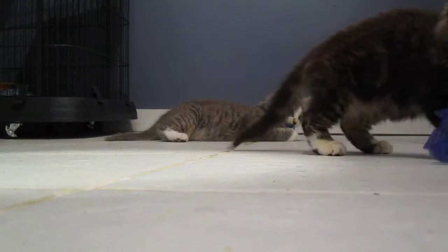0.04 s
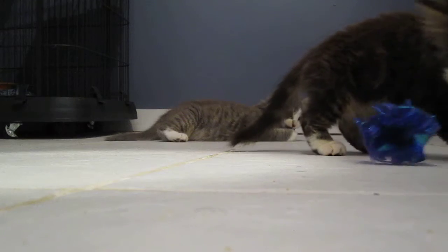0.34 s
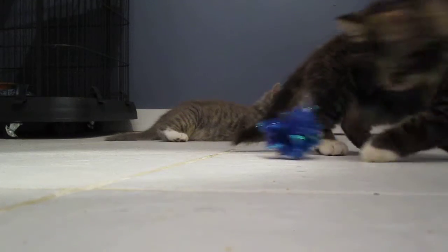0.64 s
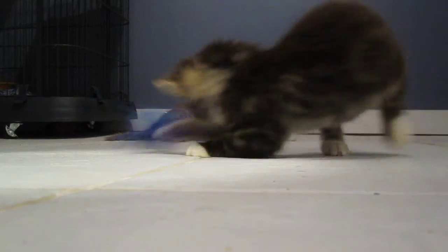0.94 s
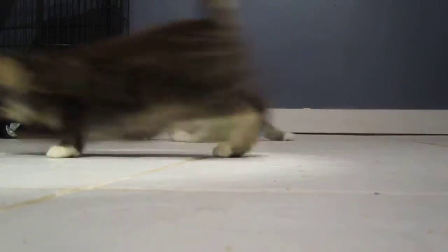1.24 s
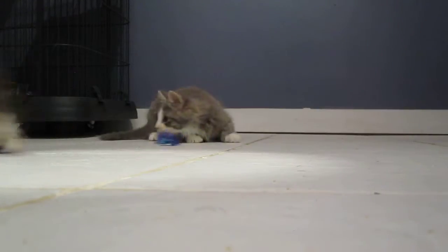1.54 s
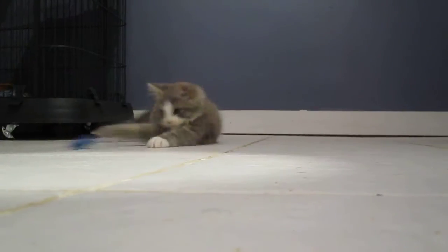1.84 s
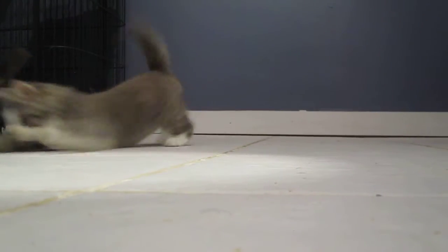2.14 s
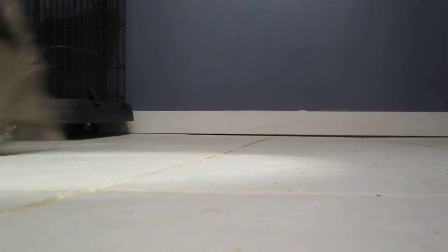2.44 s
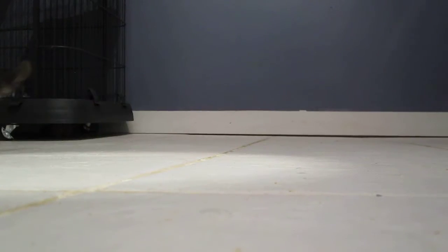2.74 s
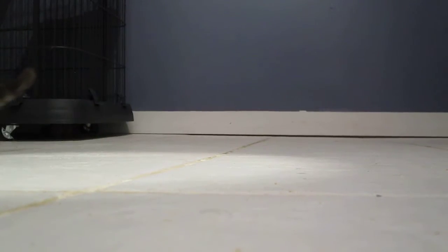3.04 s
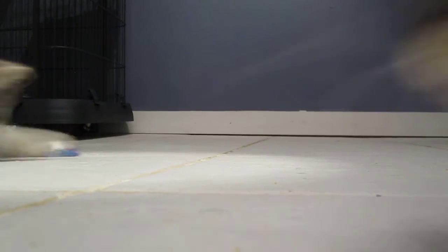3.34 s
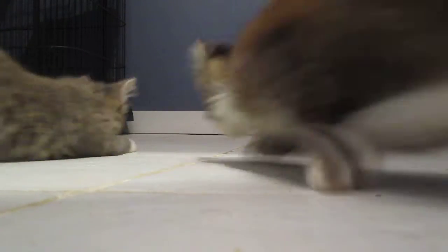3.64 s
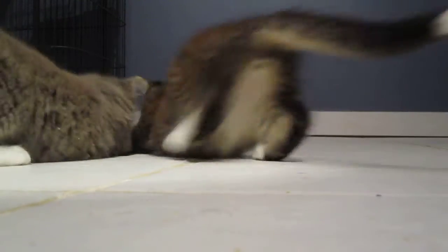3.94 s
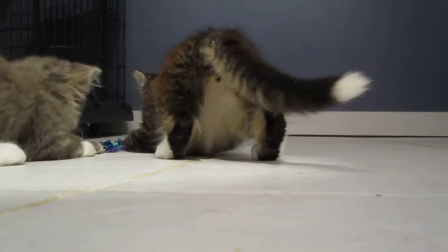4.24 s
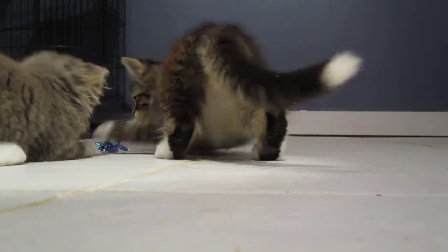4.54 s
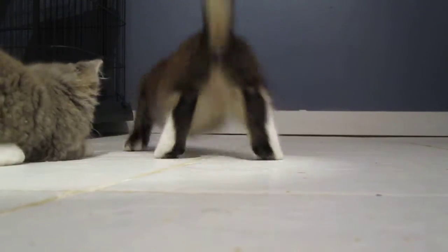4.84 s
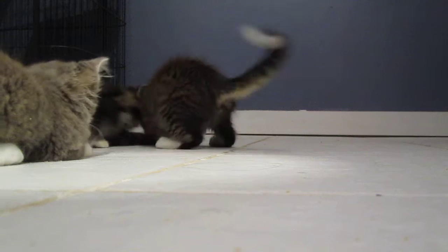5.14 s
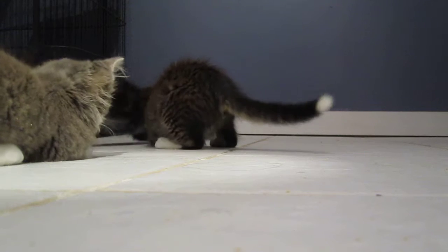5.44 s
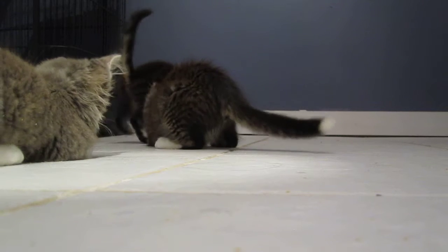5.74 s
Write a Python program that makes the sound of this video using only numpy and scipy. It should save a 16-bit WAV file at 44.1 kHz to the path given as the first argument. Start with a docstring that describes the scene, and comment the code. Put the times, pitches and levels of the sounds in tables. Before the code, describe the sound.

Kittens chase a crackling foil ball over tiles in an echoing room, paws thudding and claws ticking, with one bump against a wire cage.

```python
"""Kittens chase a foil ball over the tiles of a small, bare, echoing room, heard from floor level.
From the start the swatted ball crackles and rolls, while an appliance whines faintly behind it.
Claws tick and soft paws thud; after half a second come the first hissing skids.
Near 1.7 s a kitten slides along a wire cage and bumps it, and the wires ring on.
Then the play moves away: the swats grow weaker and carry more echo."""
import sys
import numpy as np
from scipy import signal
from scipy.fft import rfft, irfft, next_fast_len
from scipy.io import wavfile
from scipy.ndimage import uniform_filter1d, map_coordinates

SR = 44100
rng = np.random.default_rng(int(sys.argv[2]) if len(sys.argv) > 2 else 0)


def wav_out(sig):
    """Save sig, one row per channel (or a flat mono array), as 16-bit PCM at SR to the path in sys.argv[1]."""
    wavfile.write(sys.argv[1], SR, np.round(np.clip(np.atleast_2d(sig).T, -1, 1) * 32767).astype(np.int16))


N = 255339

# swats and squeezes of the foil ball: (time [s], level [dB], length [s], brightness [dB])
SWATS = [(0, -29.5, .008, 1), (0.011, -17, 0.0043, -3), (0.227, -39.5, .01, 0), (0.239, -20.5, .014, 0.5),
         (0.254, -29, 0.033, -9.5), (0.303, -36, 0.091, -10.5), (0.561, -24.5, 0.028, -4),
         (0.586, -23, 0.035, -1), (0.657, -19.5, 0.019, 7.5), (0.685, -26.5, .04, -3),
         (0.746, -36.5, .024, 6), (.871, -23.5, .018, 3.5), (0.907, -17, .009, 3.5),
         (0.931, -28.5, 0.024, -10), (0.964, -21.5, 0.06, -3.5), (1.092, -21.5, 0.012, -7),
         (1.189, -31, 0.096, -7), (1.346, -20.5, .027, -5.5), (1.377, -26.5, 0.051, -1),
         (1.433, -17.5, .04, -4.5), (1.58, -28.5, 0.035, 0), (1.603, -16.5, 0.027, 1.5),
         (1.651, -21.5, 0.062, -0.5), (1.93, -35.5, 0.093, -13), (2.102, -20, .016, 8.5),
         (2.263, -31.5, 0.014, 0.5), (2.402, -33, 0.16, -2), (2.882, -26, 0.01, -8),
         (2.944, -37, 0.12, 3.5), (3.319, -27, 0.095, 6), (3.449, -24, 0.04, 5), (3.613, -36.5, 0.1, -1.5),
         (3.866, -40.5, 0.062, 4), (4.039, -41.5, .029, 10), (4.362, -42, .015, 2), (4.649, -36, 0.029, 0),
         (4.947, -28.5, 0.0087, 6), (5.018, -36.5, 0.017, 0), (5.063, -35.5, 0.042, -2.5),
         (5.113, -32, 0.022, -2.5), (5.235, -38.5, 0.02, 0), (5.28, -37, 0.036, -6),
         (5.739, -43.5, 0.028, -3)]
# how briskly the kittens move, heard as fur brushing the tiles: (time [s], level [dB])
BUSTLE = [(.05, -43), (.15, -51.5), (.45, -47), (.82, -45), (1.2, -44.5), (1.45, -38.5), (1.72, -34),
          (2.22, -42), (2.52, -39.5), (2.95, -46), (3.17, -48.5), (3.56, -41.5), (3.72, -50.5),
          (3.98, -44.5), (4.25, -61), (4.7, -52.5), (5.17, -46), (5.79, -53)]


def amp(db):
    """Turn decibels into a number to multiply by."""
    return 10 ** (np.asarray(db) / 20)


def unit(x):
    """Scale x to an average (rms) level of 1."""
    return x / np.sqrt(np.mean(x ** 2) + 1e-20)


def along(points, hz):
    """Read between (frequency [Hz], value) rows, with octaves evenly spaced."""
    freqs, values = np.transpose(points)
    return np.interp(np.log(hz + 1), np.log(freqs + 1), values)


def curve(rows):
    """Join (time [s], value) rows into one value per sample."""
    return np.interp(np.arange(N) / SR, *np.transpose(rows))


def wobble(rate):
    """A smooth curve through `rate` random values a second."""
    return map_coordinates(rng.standard_normal(N // 20), [np.arange(N) * rate / SR], mode="wrap")


def filtered(x, response):
    """Multiply each frequency in x by response(frequency)."""
    size = next_fast_len(N + SR // 2)
    return irfft(rfft(x, size) * response(np.fft.rfftfreq(size, 1 / SR)), size)[:N]


def coloured(x, spectrum):
    """Give x a tone colour from (frequency [Hz], level [dB]) rows, at an average level of 1."""
    return unit(filtered(x, lambda hz: amp(along(spectrum, hz))))


def add(track, s, sound):
    """Mix a sound in at s seconds."""
    start = max(round(s * SR), 0)
    track[start:start + len(sound)] += sound[:max(N - start, 0)]


def ping(hz, t60, t):
    """A dying tone of peak 1; t60 is its fade time, the seconds it takes to fall by 60 dB."""
    wave = np.sin(2 * np.pi * hz * t) * amp(-60 * t / t60)
    return wave / np.abs(wave).max(axis=-1, keepdims=True)


def ringing(x, tones):
    """x sets an object ringing at its own (pitch [Hz], level [dB], fade time [s]) tones."""
    t = np.arange(SR) / SR
    response = sum(amp(db) * ping(hz, t60, t) for hz, db, t60 in tones)
    return signal.fftconvolve(x, response / np.linalg.norm(response))[:N]


def scattered(level, offset_db, spread_db, count):
    """Chance events as (time [s], level [dB]): more frequent and stronger where `level` is high."""
    share = np.cumsum(level) / level.sum()
    place = np.searchsorted(share[:-1], (np.arange(count) + rng.random(count)) / count)
    db = 20 * np.log10(level[place]) + offset_db + spread_db * rng.standard_normal(count)
    return np.column_stack([place / SR, db])


def squeezes(swats, rise_s, fade_s, sag_db):
    """Joint level of (time [s], level [dB], length [s]) swats: each rises, sags while held, then fades."""
    power, t = np.zeros(N), np.arange(SR) / SR
    for s, db, length in swats:
        fall_db = sag_db * np.minimum(t / length, 1) + 60 * np.maximum(t - length, 0) / fade_s
        add(power, s, ((1 - np.exp(-t / rise_s)) * amp(db - fall_db)) ** 2)
    return np.sqrt(power)


def crackle(spectrum, spread_db, count):
    """Countless tiny creases buckle, each with its own size and pitch."""
    t = np.arange(64) / SR
    place, size, pitch = rng.random((3, count, 1))
    strength = amp(-spread_db * np.log(.02 + .98 * size))  # many weak, a few strong
    grains = strength * ping(hz=700 + 15000 * pitch, t60=.0016, t=t)
    grains *= rng.choice([-1, 1], (count, 1))
    where = (place * N).astype(int) + np.arange(len(t))
    return coloured(np.bincount(where.ravel(), grains.ravel(), N)[:N], spectrum)


def folds(x, depth_db):
    """Hollows in the foil ring at pitches that keep changing at random."""
    bands = signal.stft(x, SR, nperseg=512)[2]
    boost = uniform_filter1d(rng.standard_normal(bands.shape), size=4, axis=0)  # smooth over pitch
    boost = uniform_filter1d(boost, size=5, axis=1)  # and over time
    return unit(signal.istft(bands * amp(depth_db * unit(boost)), SR, nperseg=512)[1][:N])


def foil_ball(low_db=-7.5, fizz_db=-8.5, low_loss_per_bright=0.63):
    """Each swat crushes the foil for a moment; a bright one has more fizz and less low crackle."""
    # tone colours of the foil's crinkle, low crackle and top fizz: (frequency [Hz], level [dB])
    crinkle_colour = [(100, -53), (500, -16.5), (1800, -20.5), (3200, -1.5), (5000, -0.3), (8000, 1),
                      (10500, -0.5), (13000, -7.5), (16000, -30)]
    low_colour = [(25, -46), (100, -24), (300, -26), (700, -17.5), (1200, -5), (2000, 1.5), (3200, 1.5),
                  (4500, -2), (9000, -14.5)]
    fizz_colour = [(4000, -39), (9000, 1), (12000, 2.5), (14000, -4), (16000, -18)]
    s, db, length, bright_db = np.transpose(SWATS)

    def level(share_db):
        return squeezes(zip(s, db + share_db, length), rise_s=0.0023, fade_s=0.049, sag_db=2)

    crinkle = level(0) * folds(crackle(crinkle_colour, spread_db=3.5, count=48000), depth_db=3)
    low_level = level(low_db - low_loss_per_bright * bright_db)
    low = low_level * folds(crackle(low_colour, spread_db=2, count=40000), depth_db=2)
    fizz = level(fizz_db + bright_db) * crackle(fizz_colour, spread_db=5.5, count=36000)
    fits = amp(1.04 * wobble(170) - 2.5)  # the foil gives way in fits
    return fits * (crinkle + low + fizz)


def rustle_level(roll_db=-15):
    """Fur brushes the floor as the kittens move, and every swat sets the ball rolling."""
    pushes = [(s, db + roll_db, length) for s, db, length, _ in SWATS]
    roll = squeezes(pushes, rise_s=0.034, fade_s=0.36, sag_db=1.5)
    return np.hypot(amp(curve(BUSTLE)), roll)


def rolling(unevenness_db=1.3):
    """Ball and fur rustle unevenly over the tiles."""
    # tone colour of the rustle: (frequency [Hz], level [dB])
    rustle_colour = [(25, -27), (90, -17), (300, -8.5), (800, -2.5), (1600, 0), (3200, 1.5), (5000, 0),
                     (9000, 3), (12000, 0), (16000, -20)]
    level = rustle_level() * amp(unevenness_db * wobble(60))
    return level * folds(crackle(rustle_colour, spread_db=2, count=26000), depth_db=2.5)


def appliance(drift_hz=1.79, whirr_db=-60, air_db=-54):
    """A small motor whines and its shell whirrs, over soft room hiss."""
    # the motor's tones: (pitch [Hz], average level [dB])
    motor_tones = [(446, -69), (1577, -70), (1607, -66.5), (1835, -67.5), (1864, -69), (1894, -62.5),
                   (2181, -69), (2407, -63), (2468, -65), (3233, -66.5), (3263, -66), (6433, -72),
                   (8457, -70)]
    # where the shell vibrates most: (pitch [Hz], width [Hz], level [dB])
    shell_peaks = [(1730, 170, 1), (1870, 210, -6), (2474, 110, 5), (3280, 96, -8), (6360, 200, -5),
                   (8260, 100, -24)]
    # tone colour of the room hiss: (frequency [Hz], level [dB])
    air_colour = [(15, -20), (25, -2.5), (80, -3.5), (260, -5.5), (700, -7), (1200, -7), (1800, -8.5),
                  (2900, -14), (3400, -4), (4500, -19), (9000, -62), (16000, -63)]

    def shell(f):
        return sum(amp(db) / (1 + ((f - hz) / width * 2) ** 2) for hz, width, db in shell_peaks)

    whine, t = np.zeros(N), np.arange(N) / SR
    for hz, db in motor_tones:
        cycles = hz * t + drift_hz * np.cumsum(wobble(8)) / SR
        whine += amp(db) * np.sqrt(2) * np.sin(2 * np.pi * cycles)
    whirr = amp(whirr_db) * unit(filtered(rng.standard_normal(N), shell))
    return whine + whirr + amp(air_db) * coloured(rng.standard_normal(N), air_colour)


def ticks():
    """Single creases snap and claws tap: each is a bright crack about a millisecond long."""
    # the sharpest snaps of foil and claws: (time [s], peak level [dB])
    snaps = [(.0618, -10.5), (.3162, -11), (.5596, -15), (.7334, -21), (.8934, -9), (.9103, -8),
             (1.1348, -12.5), (1.3528, -12), (1.9944, -16.5), (2.2613, -19), (2.6898, -17), (2.7811, -20.5),
             (2.8729, -19), (3.4521, -10), (3.687, -24), (4.362, -33), (5.1158, -15.5)]
    stray_ticks = scattered(rustle_level(), offset_db=19, spread_db=0, count=50)
    out, t = np.zeros(N), np.arange(SR // 100) / SR
    band = signal.butter(2, [2800, 13500], "bandpass", fs=SR, output="sos")
    burst = np.exp(-((t - .0012) / .0005) ** 2)
    for s, db in [*snaps, *stray_ticks]:
        tick = signal.sosfilt(band, rng.standard_normal(len(t))) * burst
        add(out, s, amp(db) * tick / np.abs(tick).max())
    return out


def footfalls(second_delay_s=.036, second_db=-12.5, second_pitch_ratio=0.81, step_hz=243):
    """List every footfall: the landings, the second paw of each, and light steps in between."""
    # pounces and landings: (time [s], level [dB], pitch [Hz])
    landings = [(0.566, -38, 242), (1.003, -23.5, 482), (1.02, -29.5, 306), (1.061, -39.5, 246),
                (1.22, -34, 231), (1.326, -35, 188), (1.711, -23, 336), (1.796, -24.5, 298),
                (1.892, -33.5, 362), (2.018, -41, 170), (2.136, -34, 207.5), (2.197, -34.5, 191.5),
                (2.282, -27.5, 592), (2.301, -30.5, 224), (2.351, -25.5, 530), (2.438, -21.5, 655),
                (2.458, -28.5, 274), (2.525, -36.5, 190), (2.585, -26, 247), (2.597, -29.5, 162.4),
                (2.847, -45, 160.5), (3.06, -27.5, 474), (3.069, -43, 95.5), (3.497, -24.5, 525),
                (3.504, -31.5, 305), (3.512, -41.5, 42.3), (3.546, -33, 376), (3.724, -32.5, 400),
                (3.936, -30, 318), (3.987, -31.5, 243), (4.029, -39, 202), (4.889, -42.5, 380),
                (4.919, -41, 350), (4.958, -31, 200), (5.028, -33.5, 440), (5.07, -36, 220),
                (5.087, -35.5, 500), (5.291, -42, 218)]
    second_paws = [(s + second_delay_s, db + second_db, hz * second_pitch_ratio)
                   for s, db, hz in landings]
    steps = [(s, db, step_hz * np.exp(.25 * rng.standard_normal()))
             for s, db in scattered(amp(curve(BUSTLE)), offset_db=-7.5, spread_db=3.5, count=48)]
    return landings + second_paws + steps


def paws(fade_cycles=1.7, settle_db=-14, settle_rise_s=0.0022, settle_fade_s=0.16):
    """A soft pad gives one short push; the rest of the leg settles around it."""
    out, t = np.zeros(N), np.arange(SR // 5) / SR
    for s, db, hz in footfalls():
        push = ping(hz, fade_cycles / hz, t) * (1 - np.exp(-2 * t * hz))
        band = signal.butter(2, [hz / 2.5, hz * 1.88], "bandpass", fs=SR, output="sos")
        settle = unit(signal.sosfilt(band, rng.standard_normal(len(t))))
        settle *= (1 - np.exp(-t / settle_rise_s)) * amp(settle_db - 60 * t / settle_fade_s)
        step = push / np.abs(push).max() + settle
        # a light animal on stiff tiles moves little air below the pitch of its step
        bass_cut = signal.butter(2, hz / 3, "highpass", fs=SR, output="sos")
        add(out, s, amp(db) * signal.sosfilt(bass_cut, step))
    return out


def skids(relative_width=0.11):
    """The ball or a paw slides over the tiles: a hiss around one pitch swells and fades."""
    # the slides: (middle time [s], level [dB], length [s], pitch [Hz])
    slides = [(0.547, -40.5, 0.089, 9600), (0.611, -26, 0.046, 10800), (0.714, -33, 0.097, 10800),
              (2.992, -35, 0.027, 5900), (3.267, -48, 0.03, 3170), (3.364, -40, 0.073, 3130),
              (3.383, -43.5, 0.041, 11800), (4.53, -50, 0.025, 2510), (4.806, -52.5, 0.099, 6940)]
    out, t = np.zeros(N), np.arange(-SR // 6, SR // 6) / SR
    freqs = np.fft.rfftfreq(len(t), 1 / SR)
    for s, db, length, hz in slides:
        band = 1 / (1 + ((freqs - hz) / (relative_width * hz)) ** 2)
        hiss = irfft(rfft(rng.standard_normal(len(t))) * band, len(t))
        swell = np.exp(-(2 * t / length) ** 2)
        add(out, s + t[0], amp(db) * unit(hiss) * swell)
    return out


def cage(ring_db=-19):
    """A kitten slides along the bars and knocks into them; the wires ring on."""
    # knocks on the cage and its plastic tray: (time [s], level [dB], pitch [Hz], fade time [s])
    knocks = [(1.783, -1, 3310, 0.0028), (1.785, -20, 745, 0.01), (1.794, -14, 812, 0.046),
              (1.802, -7.5, 2640, 0.017), (1.808, -10, 900, 0.0048), (1.837, -22, 534, .056),
              (2.046, -26, 1830, .008), (2.059, -22, 1630, 0.0046), (4.746, -34.5, 1290, 0.0024)]
    # a body pushing along the bars: (time [s], level [dB])
    push = [(1.67, -73.5), (1.7, -25.5), (1.75, -24), (1.772, -30), (1.8, -20), (1.815, -46),
            (1.875, -35.5), (1.95, -98)]
    # tone colour of the scraped bars: (frequency [Hz], level [dB])
    bar_colour = [(30, -32), (100, -25), (300, 0.5), (800, -6), (1300, 0.5), (1750, 5.5), (2200, -2.5),
                  (3000, 2), (4500, -11), (9000, -39)]
    # the wires' own tones: (pitch [Hz], level [dB], fade time [s])
    wire_tones = [(530, -14, 0.27), (782, 1, 0.4), (1060, -2, 1), (1317, 17.5, 0.24), (1484, 8, 0.77),
                  (1520, -6, .5), (1696, 0, 1), (1920, 5, 0.76), (2100, 4, 0.3), (1950, 6, 0.6),
                  (2180, -15, 0.54), (2320, -8, .5), (2550, -23, 0.36), (2702, -19, 0.26),
                  (2640, -21, 0.53), (3030, -10, .5), (2920, -9, 0.41), (3450, -9, .6)]
    blows, t = np.zeros(N), np.arange(SR // 4) / SR
    for s, db, hz, t60 in knocks:
        add(blows, s, amp(db) * ping(hz, t60, t))
    bass_cut = signal.butter(1, 200, "highpass", fs=SR, output="sos")  # thin bars give off little bass
    push_db = curve(push)
    scrape_level = amp(push_db + 1.2 * wobble(200)) * (push_db > -65)
    scrape = scrape_level * coloured(rng.standard_normal(N), bar_colour)
    contact = signal.sosfilt(bass_cut, blows) + scrape
    return contact + amp(ring_db) * ringing(contact, wire_tones)


def room_echo(x):
    """Bare walls scatter the sound into a smooth echo; each frequency dies at its own speed."""
    # how long the echo lasts: (frequency [Hz], fade time [s])
    fade_times = [(100, 1), (300, 0.31), (1000, 0.44), (4000, 0.52), (9000, 0.41), (16000, 0.21)]
    delayed = np.pad(x, (SR // 200, 0))[:N]
    hz, _, bands = signal.stft(delayed, SR, nperseg=256)
    scatter = signal.stft(rng.standard_normal(N), SR, nperseg=256)[2]
    kept = amp(-60 * 128 / SR / along(fade_times, hz)) ** 2  # share of energy left after 128 samples
    energy = np.array([signal.lfilter([1 - k], [1, -k], np.abs(band) ** 2)
                       for k, band in zip(kept, bands)])
    echo = signal.istft(np.sqrt(energy) * scatter / scatter.std(), SR, nperseg=256)[1][:N]
    return filtered(echo, lambda f: f ** 2 / (f ** 2 + 130 ** 2))  # the echo holds little bass


def room_boom(thuds):
    """Footfalls stir the low tones that build up between the walls."""
    # the room's standing waves: (pitch [Hz], level [dB], fade time [s])
    room_tones = [(80, -9, 0.69), (105.7, 4, 0.24), (149.8, -7, 0.48), (180.1, 2, 0.65), (231.4, 5, 0.29),
                  (272.4, -11, 0.5), (307.2, -7, 0.53), (412, -8, 1), (497, -2.5, 0.57)]
    return ringing(thuds, room_tones)


def scene():
    """Ball, claws, paws and cage sound in the room, with the appliance behind them."""
    # echo share of the crisp sounds, growing as the play moves away: (time [s], level [dB])
    echo_share = [(0, -7.5), (1.0, -4), (2.0, -5), (3.4, -1), (5.8, -4)]
    crisp = foil_ball() + rolling() + skids() + ticks()
    thuds, bump = paws(), cage()
    echo = room_echo(amp(curve(echo_share)) * crisp + amp(-5.5) * thuds + amp(-13) * bump)
    boom = amp(-19) * room_boom(thuds)
    return (crisp + thuds + bump + echo + boom + appliance())[None]


def record(dry):
    """The very highest treble is cut off."""
    top_hz = 16100
    return filtered(dry[0], lambda hz: hz < top_hz)[None]


dry = scene()
out = record(dry)
wav_out(out)
```